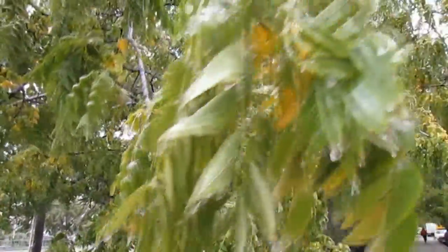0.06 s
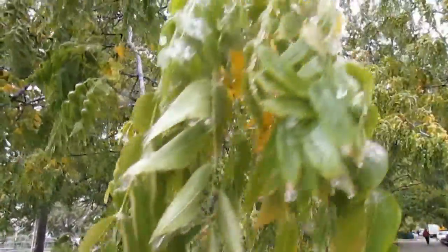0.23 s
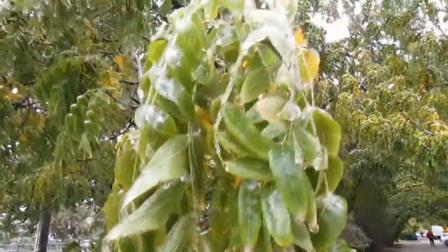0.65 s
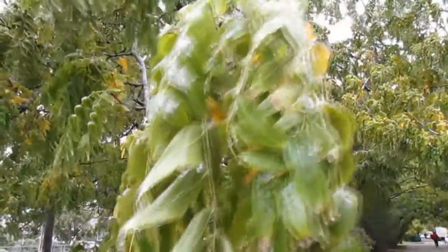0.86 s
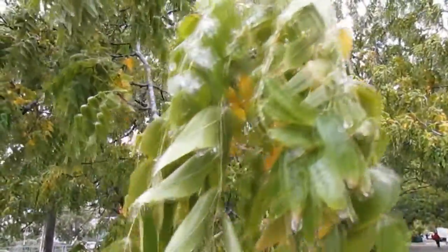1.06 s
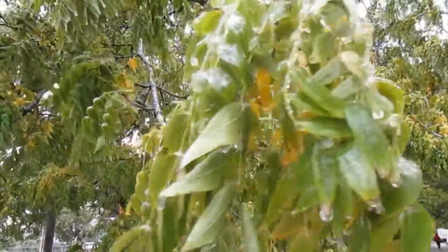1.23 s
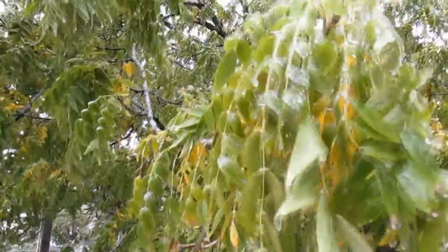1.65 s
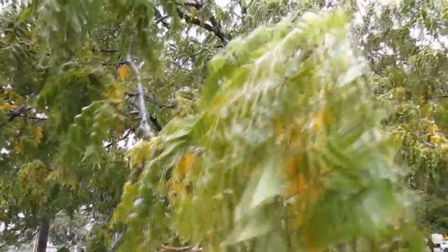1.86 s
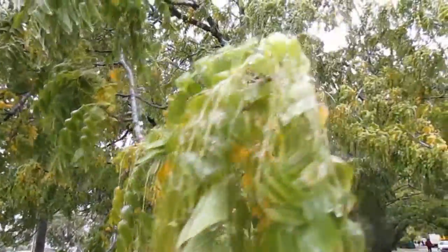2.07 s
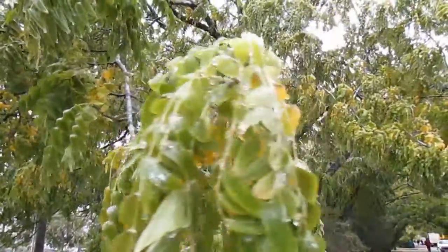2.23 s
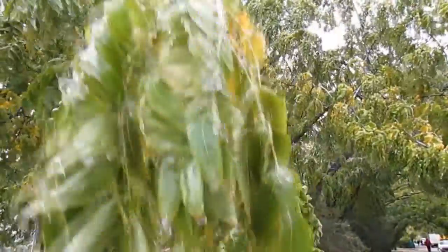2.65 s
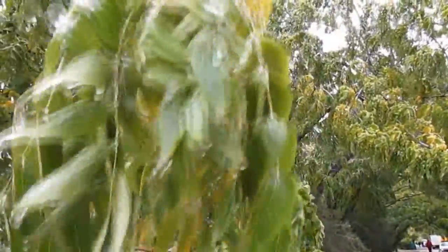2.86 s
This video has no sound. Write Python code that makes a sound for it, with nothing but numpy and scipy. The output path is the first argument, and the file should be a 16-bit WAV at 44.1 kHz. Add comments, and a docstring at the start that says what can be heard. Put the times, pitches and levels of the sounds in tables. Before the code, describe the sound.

Gusty wind rumbles and buffets the microphone, with leaves faintly hissing behind it.

```python
"""A low, gusty rumble of wind swells on two microphone ports under leafy trees.
Eddies puff and buffet the ports, largely in opposite phase. The hardest slaps of air overload the
recorder, whose gain control ducks everything, then creeps back. Behind the wind lie a far roar and
the hiss of foliage, while nearby leaves tick against each other."""
import sys
import numpy as np
from scipy import signal
from scipy.fft import rfft, irfft
from scipy.io import wavfile

SR = 44100
rng = np.random.default_rng(int(sys.argv[2]) if len(sys.argv) > 2 else 0)


def store_wav(level_fs):
    """Save 16-bit WAV to argv[1]."""
    pcm = np.round(np.clip(np.atleast_2d(level_fs), -1, 1) * 32767)
    wavfile.write(sys.argv[1], SR, pcm.T.astype(np.int16))


N = 132300
TIME, FREQS = np.arange(N) / SR, np.fft.rfftfreq(N, 1 / SR)
OPPOSED = np.array([[1], [-1]])  # plus on the left, minus on the right


def amp(db):
    """Decibels to gain."""
    return 10 ** (np.asarray(db) / 20)


def unit_rms(x):
    """Scales to an rms of one."""
    return x / np.sqrt(np.mean(x ** 2) + 1e-20)


def curve(rows, column=1):
    """One column of a time table as a fader ride, sample by sample."""
    rows = np.array(rows)
    return np.interp(TIME, rows[:, 0], rows[:, column])


def colour(x, spectrum):
    """An EQ that keeps the power of white noise: only the spectrum's shape counts."""
    hz, db = np.transpose(spectrum)
    gain = amp(np.interp(np.log(FREQS + 1), np.log(hz), db))
    return irfft(rfft(x) * unit_rms(gain), N)


def wobble(rate_hz):
    """Smooth random motion up to about a rate, with its extremes rounded off."""
    band = FREQS / (FREQS + rate_hz / 10) / (1 + (FREQS / rate_hz) ** 4)
    drift = unit_rms(irfft(rfft(rng.standard_normal(N)) * band, N))
    return 2 * np.tanh(drift / 2)


def stereo_noise(correlation):
    """White noise whose image narrows as the correlation nears one."""
    mid, side = rng.standard_normal((2, N))
    return np.sqrt((1 + correlation) / 2) * mid + np.sqrt((1 - correlation) / 2) * side * OPPOSED


def eddy(spectrum, levelling_s=0.0044):
    """Coloured noise with its chance peaks evened out, so that each eddy keeps its own strength."""
    noise = colour(rng.standard_normal(N), spectrum)
    smoothing = np.exp(-(np.pi * FREQS * levelling_s) ** 2)
    power = irfft(rfft(noise ** 2) * smoothing, N)
    return unit_rms(noise / np.sqrt(abs(power) + np.mean(noise ** 2) / 20))


# Tone of the far roar, the leaf hiss and its airy top (frequency [Hz], relative level [dB])
ROAR_EQ = [(30, -23), (120, 4), (250, -5.5), (500, -6.5), (950, 1), (1400, -3), (1800, -4), (2400, -18),
           (3400, -23), (6000, -49)]
HISS_EQ = [(500, -37), (2500, -3), (3500, 0), (4700, -2.5), (7000, 0), (9500, -2.5), (12000, -6.5),
           (15500, -18.5)]
FIZZ_EQ = [(3000, -38), (7000, -10.5), (10000, -7.5), (13000, -11), (15500, -12)]
# Where the roar sits (frequency [Hz], left boost and right cut [dB])
ROAR_LEAN = [(200, 9.5), (500, -6.5), (1000, -3.5), (1400, 0.5), (1900, 1.65)]
# The breeze swelling in the trees (time [s], roar gain [dB], leaf gain [dB])
BREEZE_RIDE = [(0, -6.5, -10), (.25, -2.5, -6), (.5, 2.5, 0), (.8, 2, 1), (1.1, 3, 1), (1.6, 2, 1),
               (2, -3.5, -4.5), (2.5, -3.5, -4.5), (3, -5, -3.5)]


def trees(roar_db=-38.5, hiss_db=-55, fizz_db=-58.5):
    """The bed: a far roar of wind and perhaps traffic, and the hiss and wide fizz of nearby leaves."""
    hz, pan_db = np.transpose(ROAR_LEAN)
    lean = amp(np.interp(FREQS, hz, pan_db) * OPPOSED)
    roar = colour(stereo_noise(correlation=0.47), ROAR_EQ)
    roar = irfft(rfft(roar) * lean, N)
    hiss = colour(stereo_noise(correlation=0.98), HISS_EQ) * amp(hiss_db)
    fizz = colour(stereo_noise(correlation=-0.32), FIZZ_EQ) * amp(fizz_db)
    roar_gain = amp(roar_db + curve(BREEZE_RIDE, column=1) + 0.73 * wobble(rate_hz=36))
    leaf_gain = amp(curve(BREEZE_RIDE, column=2) + 0.96 * wobble(rate_hz=29) + 0.27 * OPPOSED)
    return roar * roar_gain + (hiss + fizz) * leaf_gain


# Single leaf taps (time [s], level [dB])
TICK_CUES = [(.4264, -50), (.9178, -47), (2.0197, -43.5)]
# Their crisp tone (frequency [Hz], relative level [dB])
TICK_EQ = [(1000, -12), (5000, -13), (7500, -2), (9500, 2), (12000, -10), (16000, -15)]


def leaf_ticks(tick_decay_s=0.0027, crackle_decay_s=0.0014, taps_per_s=440, crackle_db=-68.5):
    """Leaves tap each other: a few clear ticks over a fine crackle."""
    envelope = np.zeros(N)
    for start, db in TICK_CUES:
        envelope += amp(db) * (TIME >= start) * np.exp(-abs(TIME - start) / tick_decay_s)
    taps = (rng.random(N) < taps_per_s / SR) * rng.random(N) ** 2
    crackle = signal.lfilter([1], [1, -np.exp(-1 / (crackle_decay_s * SR))], taps)
    envelope += amp(crackle_db) * unit_rms(crackle)
    return colour(stereo_noise(correlation=0.95) * envelope, TICK_EQ)


# Gusts at the microphone (time [s], rumble gain [dB])
GUST_RIDE = [(0, -16.5), (.2, -5), (.42, -9), (.65, 3), (.76, -1), (.87, 9.5), (1.1, 3), (1.21, -0.5),
             (1.4, -0.5), (1.6, 2), (1.79, 1.5), (1.96, -6), (2.1, -6.5), (2.42, -4), (2.7, -0.5),
             (2.8, -5), (3, -14.5)]
# Tone of the low rumble and the flutter above it (frequency [Hz], relative level [dB])
RUMBLE_EQ = [(20, -29), (35, -48), (55, -3), (100, -3.5), (200, -1.5), (350, -10), (700, -19.5),
             (1400, -28.5), (4500, -106)]
FLUTTER_EQ = [(70, -35), (130, -8), (230, 7.5), (400, 5.5), (700, -10), (1200, -19.5), (2400, -36),
              (5000, -100)]


def rumble(rumble_db=-33, flutter_db=-28.5):
    """Lumpy turbulence: a low rumble in both ports and a higher flutter between them."""
    gust_db, lumps = curve(GUST_RIDE), wobble(rate_hz=69)
    low = eddy(RUMBLE_EQ) * amp(rumble_db + gust_db) * unit_rms(amp(4.2 * lumps))
    flutter = eddy(FLUTTER_EQ) * amp(flutter_db + 1.4 * gust_db) * unit_rms(amp(10 * lumps))
    return low * amp(0.5 * OPPOSED) + flutter * OPPOSED


# Soft puffs of air (start [s], length [s], relative level [dB], thud send [dB])
PUFF_CUES = [(0.481, 0.041, -29, -9), (0.611, 0.029, -29, 2), (0.842, 0.034, -19.5, -1.5),
             (1.264, 0.033, -25, -5.5), (1.373, 0.015, -24.5, -15), (1.454, 0.043, -24, 0.5),
             (1.549, 0.042, -31.5, 2), (1.731, 0.087, -32, 7.5), (2.015, 0.1, -32.5, 2),
             (2.166, 0.097, -38.5, 9), (2.315, 0.042, -37.5, 2.5), (2.504, 0.029, -31, 7),
             (2.618, 0.13, -36.5, 4.5)]
# Tone of a puff and of the thud under it (frequency [Hz], relative level [dB])
PUFF_EQ = [(40, -36), (90, -6), (160, 7.5), (260, 2), (420, -10), (800, -18.5), (1500, -24), (4500, -102)]
THUD_EQ = [(20, -24), (35, -10), (55, -5), (90, 12.5), (150, -5), (250, -16.5), (900, -84)]


def puffs(roundness=0.44, lean_db=1, flutter_db=6, thud_db=-4.5):
    """Slow eddies: dull, fluttering puffs, some with a deep thud in both ports."""
    envelope, thud_envelope = np.zeros((2, N))
    for start, length, db, send_db in PUFF_CUES:
        progress = np.clip((TIME - start) / length, 0, 1)
        swell = amp(db) * (4 * progress * (1 - progress)) ** roundness  # an arch with steep ends
        envelope += swell
        thud_envelope += swell * amp(send_db)
    air = amp(lean_db * OPPOSED) * eddy(PUFF_EQ) + amp(flutter_db) * eddy(FLUTTER_EQ) * OPPOSED
    return envelope * air + amp(thud_db) * thud_envelope * eddy(THUD_EQ)


# Stronger eddies (centre time [s], length [s], relative level [dB])
BUFFET_CUES = [(0.144, 0.019, -20.5), (0.48, 0.015, -18), (.5, .018, -14), (0.574, 0.015, -12.5),
               (0.611, 0.01, -11.5), (0.647, 0.022, -9.5), (0.699, 0.021, -11.5), (0.73, 0.0022, -11),
               (.797, .008, -11.5), (0.806, 0.019, -15.5), (0.858, 0.053, -9.5), (0.933, 0.013, -12.5),
               (1.017, 0.022, -11.5), (1.071, 0.018, -6.5), (1.13, 0.02, -6.5), (1.158, 0.015, -11.5),
               (1.658, 0.0044, -8), (1.804, 0.0085, -12), (2.063, .012, -22.5), (2.628, 0.012, -12),
               (2.646, 0.0077, -14), (2.742, 0.0034, -9)]
# Tone of their opposed flap and of the body both ports share (frequency [Hz], relative level [dB])
FLAP_EQ = [(100, -62), (200, -14.5), (380, 4), (650, -3), (950, -9.5), (1400, -26), (2300, -50),
           (5000, -103)]
BODY_EQ = [(40, -30.5), (110, -2), (170, 6), (380, 5), (650, -3), (1000, -12.5), (1800, -58), (6000, -100)]


def buffets(trim_db=-1, rough_db=4.5, body_db=-10, lean_db=-0.4):
    """Short ragged flaps as stronger eddies cross the ports."""
    power = sum(amp(db) ** 2 / (1 + (2 * (TIME - centre) / length) ** 4)
                for centre, length, db in BUFFET_CUES)
    roughness = unit_rms(amp(rough_db * wobble(rate_hz=167)))
    flap = eddy(FLAP_EQ) * OPPOSED * amp(lean_db * OPPOSED)
    body = amp(body_db) * eddy(BODY_EQ)
    return np.sqrt(power) * amp(trim_db) * roughness * (flap + body)


# Hard hits of air on the ports (centre time [s], length [s], level [dB], pitch [Hz])
SLAP_CUES = [ (0.1465, .004, -8.5, 530), (.4808, 0.0028, -4.5, 614), (0.503, 0.0019, -2, 530),
             (0.5805, 0.0031, -4.5, 497), (0.5874, 0.0034, 1, 516), (0.6384, 0.0017, -6, 490),
             (0.6517, 0.0042, -2.5, 495), (0.704, 0.0035, 0, 480), (.8638, .0034, -1, 500),
             (.868, .0031, 5.8, 490), (1.062, .0024, 1, 850), (1.0669, 0.00093, 2.5, 765),
             (1.0745, 0.004, -5, 564), (1.1243, 0.0059, 2, 530), (1.8091, .002, 2.3, 700),
             (2.6128, 0.003, -1.5, 610), (2.7318, .0026, 0, 630), (2.7349, .0036, 1.6, 630), ]


def slaps(shared_db=-17, push_db=-20, push_ratio=0.42, push_stretch=0.99, lean_db=-0.72):
    """Violent, uneven pressure swings, nearly opposite in the two ports, over a slower push on both."""
    out = np.zeros((2, N))
    phase_jitter = 0.2 * wobble(rate_hz=460)
    for centre, length, db, hz in SLAP_CUES:
        near = abs(TIME - centre) < 10 * length
        offset_s = TIME[near] - centre
        phase = 2 * np.pi * hz * offset_s + phase_jitter[near]
        taper = np.pi * offset_s / length
        flap = (np.sin(phase) * OPPOSED + amp(shared_db) * np.cos(phase)) / np.cosh(taper)
        push = amp(push_db) * np.cos(push_ratio * phase) / np.cosh(taper / push_stretch)
        out[:, near] += amp(db + lean_db * OPPOSED) * (flap + push)
    return out


def ports(x, side_cut_hz=122):
    """The close ports hear deep sound alike: their difference loses its bass."""
    side = signal.lfilter(*signal.butter(2, side_cut_hz, "high", fs=SR), (x[0] - x[1]) / 2)
    return x.mean(0) + side * OPPOSED


def scene():
    """The mix: wind on the ports up front, trees behind, leaf ticks on top."""
    wind = rumble() + puffs() + buffets() + slaps()
    return ports(wind + trees()) + leaf_ticks()


def record(dry, threshold_db=-11, lag_s=0.0043, recover_db_per_s=13, duck_share=0.92,
           clip_hardness=60, cutoff_hz=15850):
    """Gain control ducks a moment late and recovers slowly; peaks clip; the top treble is cut."""
    pole = np.exp(-1 / (lag_s * SR))
    lag = [1 - pole], [1, -pole]
    power_db = 10 * np.log10(signal.lfilter(*lag, (dry ** 2).mean(0)) + 1e-12)
    fall_db = TIME * recover_db_per_s
    held_db = np.maximum.accumulate(power_db + fall_db) - fall_db  # catches each peak, then sinks
    over_db = np.maximum(held_db - threshold_db, 0)
    ducked = dry * amp(-duck_share * signal.lfilter(*lag, over_db))
    clipped = ducked / (1 + abs(ducked) ** clip_hardness) ** (1 / clip_hardness)
    lowpass = signal.firwin(511, cutoff_hz, window=("kaiser", 9), fs=SR)
    return signal.oaconvolve(clipped, lowpass[None], "same")


dry = scene()
out = record(dry)
store_wav(out)
```